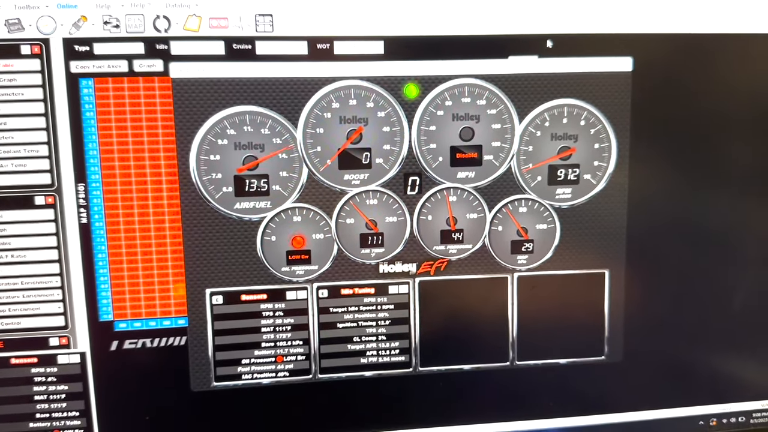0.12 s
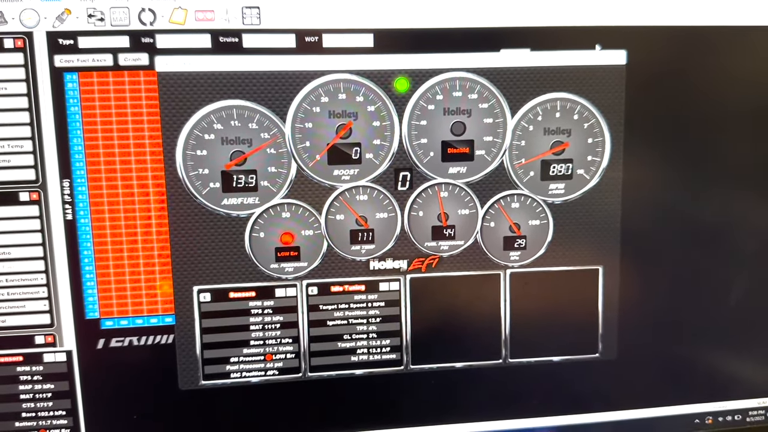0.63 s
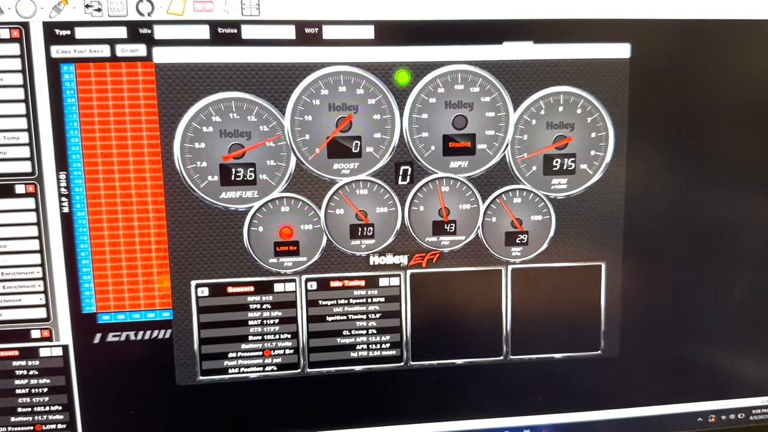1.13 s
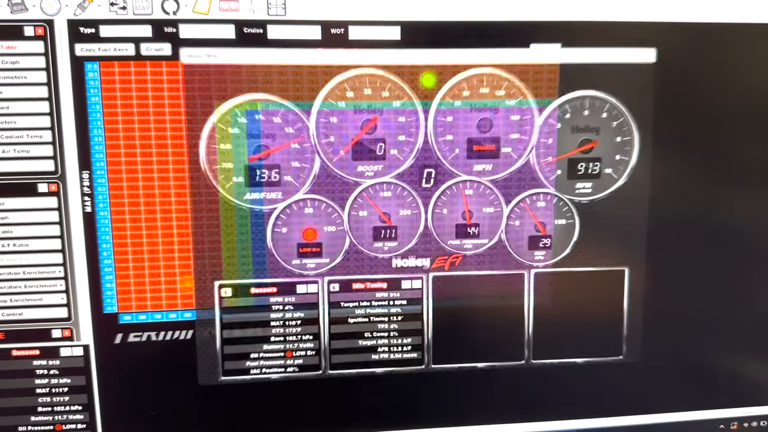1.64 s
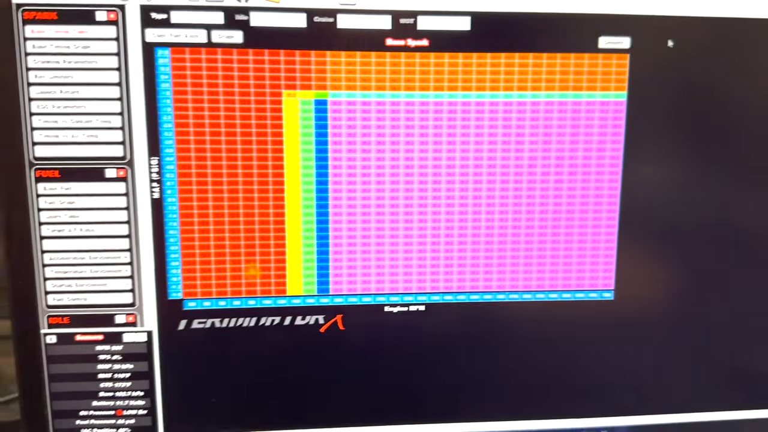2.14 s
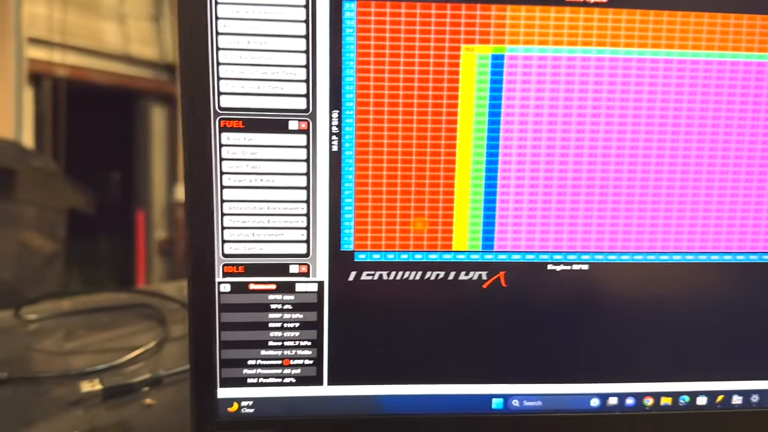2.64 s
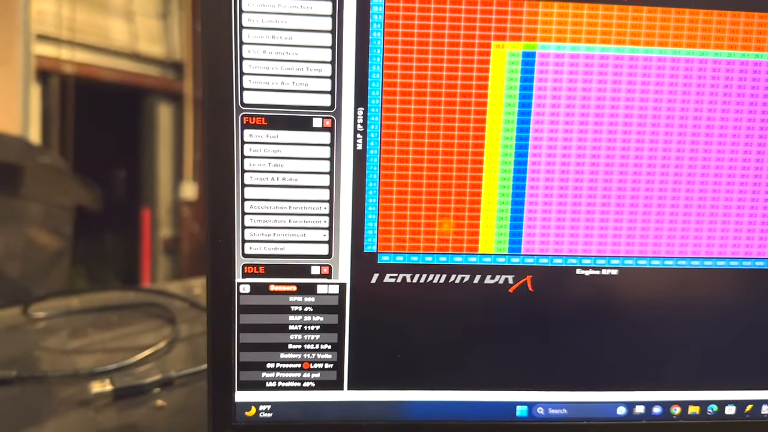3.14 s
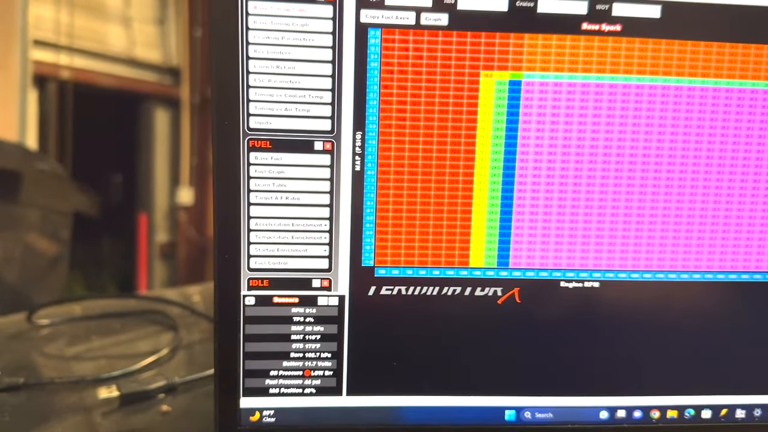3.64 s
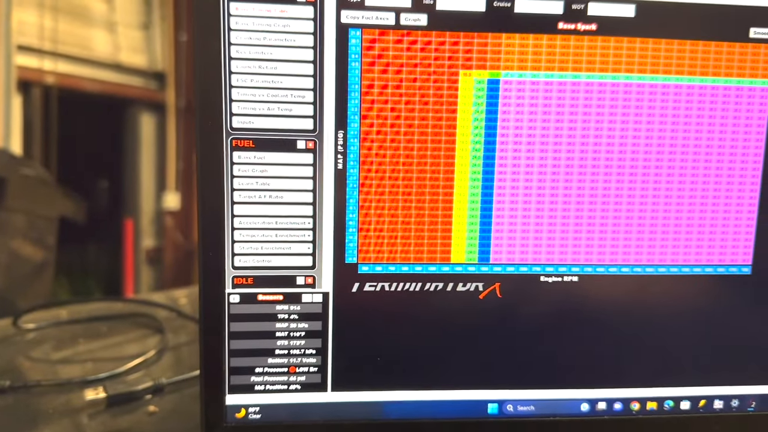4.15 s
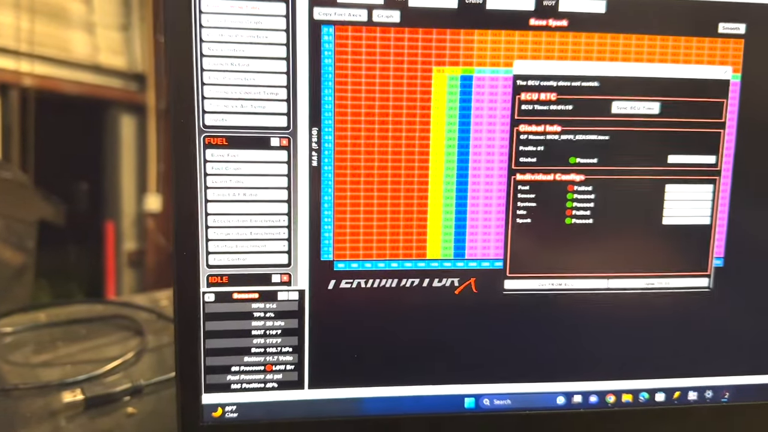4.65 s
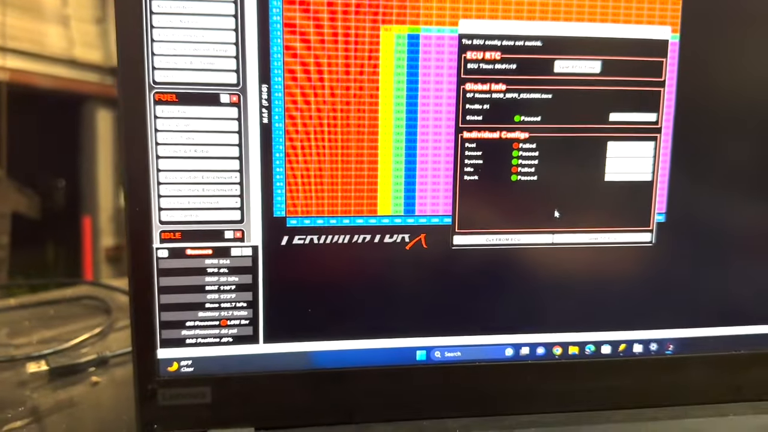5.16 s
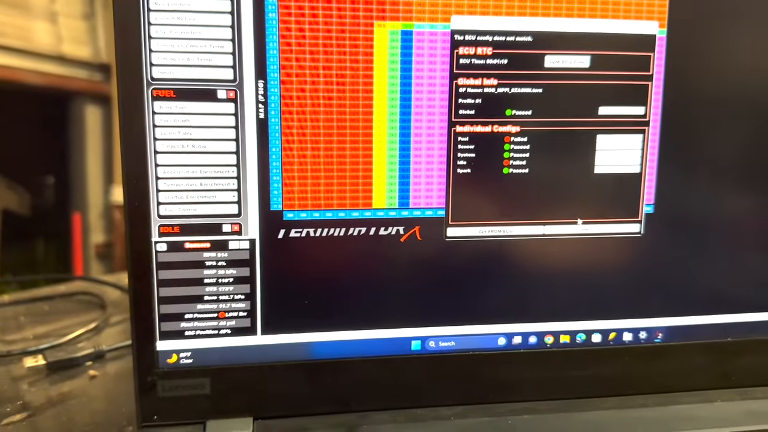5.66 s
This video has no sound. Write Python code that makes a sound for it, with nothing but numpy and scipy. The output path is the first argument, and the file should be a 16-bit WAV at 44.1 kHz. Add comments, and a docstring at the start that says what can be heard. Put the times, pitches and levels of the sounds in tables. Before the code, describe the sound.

Lumpy big-engine idle with low exhaust pulses, a thin wavering blower whine and soft mechanical hiss, growing slightly louder throughout.

```python
"""A rough, throbbing V8 idle near 900 rpm in a garage, with a supercharger's whine and a bed of hiss, in stereo.
Exhaust: eight uneven firings in two banks strike the decaying resonances of pipes and room.
Blower: sines at multiples of the rotor rate follow the crank and sing up when the idle flares.
Chuff: a puff of noise once a cycle excites a short pipe resonance.
Air: shaped noise for exhaust turbulence, belts and intake, with broad rings and a flickering level."""
import sys
import numpy as np
from scipy import signal
from scipy.fft import rfft, irfft
from scipy.io import wavfile
from scipy.ndimage import uniform_filter1d

SR = 44100
rng = np.random.default_rng(int(sys.argv[2]) if len(sys.argv) > 2 else 0)


def decibels_to_gain(level_db):
    """Convert a level in decibels to a linear amplitude gain (20 dB per decade)."""
    exponent = np.asarray(level_db, float) / 20
    return 10 ** exponent


def store_wav(level_fs):
    """Save 16-bit WAV to argv[1]."""
    pcm = np.round(np.clip(np.atleast_2d(level_fs), -1, 1) * 32767)
    wavfile.write(sys.argv[1], SR, pcm.T.astype(np.int16))


N = 254898
T = np.arange(N) / SR
HZ = np.fft.rfftfreq(N, 1 / SR) + 1e-3  # the offset keeps log(HZ) finite

# crank speed: (time [s], speed [rpm])
CRANK_SPEED = [(0.0, 909.81), (0.251, 897.77), (0.503, 895.82), (0.755, 908.46), (1.012, 916.3),
               (1.514, 909.66), (1.788, 911.91), (2.28, 896.48), (2.783, 899.32), (3.286, 911.81),
               (3.517, 914.74), (3.786, 932.75), (4.243, 934.19), (4.441, 925.83), (4.71, 913.22),
               (5.573, 903.78), (5.78, 906.38)]
# relative loudness at the phone: (time [s], exhaust [dB], turbulence, chuff and hiss [dB])
NEARNESS_LEVELS = [(0, -2.5, -1.5), (.8, -1.5, -1), (1.6, 0, 0.5), (2.4, -1, 0), (3.2, 0.5, 1), (4, -1, 2),
                   (4.9, 0.35, 1.96), (5.78, 0.5, 2)]


def curve(table, order):
    """One column of a table, interpolated over time."""
    table = np.array(table)
    return np.interp(T, table[:, 0], table[:, order])


def colour(x, points, boost_db=0):
    """Shape a sound's spectrum by (frequency [Hz], level [dB]) points on a log axis, plus a boost."""
    hz, db = np.transpose(points)
    gain_db = np.interp(np.log(HZ), np.log(hz), db) + boost_db
    return irfft(rfft(x) * decibels_to_gain(gain_db), N)


def resonance(hz, width_hz):
    """Bell over frequency, 1 at its centre and one half at the edges of its width."""
    return 1 / (1 + (2 * (HZ - hz) / width_hz) ** 2)


def walk(rate):
    """Random levels held 1 / rate s and smoothed twice; spread near 1."""
    hold = int(SR / rate)
    held = np.repeat(rng.standard_normal(N // hold + 1), hold)
    return 1.67 * uniform_filter1d(uniform_filter1d(held, hold), hold)[:N]


def exhaust(cycle):
    """One pressure pulse a firing, never quite equal; each bank rings the resonances in its own way."""
    # in firing order; lateness comes from header length:
    # (bank [0 or 1], relative strength [dB], mean lateness [ms])
    cylinders = [(1, -0.4, 1.21), (0, 0.4, 0.65), (1, 0.2, 1.48), (1, 3.8, 1.64), (0, -1.1, 0.63),
                 (1, -3.6, 0.88), (0, -3.2, -0.38), (0, 4.0, 0.27)]
    # exhaust and garage resonances: (frequency [Hz], t60 [s], then signed relative gains [per mille]:
    # left port from bank 0, left from bank 1, right port from bank 0, right from bank 1)
    exhaust_modes = [(64.7, 0.16, 134, 278, 157, 318), (69.3, 0.3, -393, -121, -356, -108),
                     (75.2, 0.13, 240, -354, 136, -336), (94.3, 0.1, -181, -134, -214, -208),
                     (107.5, 0.29, 110, 62, 89, 92), (124.9, 0.3, -53, 78, -54, 80),
                     (137.8, 0.3, -59, -134, -90, -195), (152.2, 0.41, 83, 71, 121, 100),
                     (174.0, 0.3, -1, 46, -3, 62), (191.0, 0.31, -14, -3, -24, -4),
                     (202.4, 0.45, 1, 12, -2, 7), (221.9, 0.16, 19, -12, 27, -27),
                     (248.1, 0.24, 38, 24, 42, 39), (262.6, 0.35, -19, -23, -22, -24),
                     (288.2, 0.19, 12, 4, 16, 3), (333.4, 0.27, 11, -33, 18, -25),
                     (338.0, 0.18, -11, 27, -13, 16), (389.4, 0.22, -6, 30, 4, 17),
                     (394.6, 0.17, 9, -28, 2, -16)]
    scatter_db, jitter_ms = .6, .08

    firing = np.arange(-24, int(8 * cycle[-1]))
    bank, strength_db, late_ms = np.array(cylinders)[firing % 8].T

    # the engine already runs, so the room is ringing from the start
    lead = SR // 2
    earlier = cycle[0] - (cycle[1] - cycle[0]) * np.arange(lead, 0, -1)
    turns = np.r_[earlier, cycle]

    time_chance, level_chance = rng.standard_normal((2, len(firing)))
    on_time = np.interp(firing / 8, turns, np.arange(lead + N))
    at = on_time + (late_ms + jitter_ms * time_chance) * SR / 1000
    pulses = np.zeros((2, lead + N + SR))
    pulses[bank.astype(int), at.astype(int)] = decibels_to_gain(strength_db + scatter_db * level_chance)

    ports = 0
    for hz, t60, *gains in exhaust_modes:
        pole = np.exp(2j * np.pi * hz / SR - np.log(1000) / (t60 * SR))
        ringing = signal.lfilter([1], [1, -pole], pulses).imag  # decaying sines, one row a bank
        ports = ports + np.reshape(gains, (2, 2)) / 1000 @ ringing

    # the small microphone loses the deepest bass
    cut = signal.butter(2, 55, "high", fs=SR, output="sos")
    heard = signal.sosfilt(np.r_[cut, cut], ports)[:, lead:lead + N]
    return heard * decibels_to_gain(curve(NEARNESS_LEVELS, order=1))


def blower(cycle):
    """Multiples of the rotor-lobe rate; a steady direct part plus reflections that flutter in size and phase."""
    # rotor multiples, relative levels: (multiple, rms common to both ports [dB], rms differing [dB],
    # common gain in the flare [dB], differing gain in the flare [dB])
    whine_lines = [(2, -44, -50, -3, 0), (5, -47, -45, -4, -2), (6, -54, -51, 2, 0), (7, -53, -53, -2, 0),
                   (8, -50, -55, 5, 8), (9, -56, -54, 8, 8), (10, -48, -43, 7, 0), (11, -53, -52, 11, 9),
                   (12, -54, -57, 6, 8), (13, -56, -59, -4, -1), (14, -58, -61, -3, 0),
                   (15, -57, -61, -3, 0), (17, -66, -69, 0, 0), (19, -63, -65, 0, 0), (20, -65, -67, 0, 0),
                   (21, -64, -67, 0, 0), (31, -64, -67, 0, 0), (32, -62, -67, -3, 0), (38, -69, -71, 0, 0)]
    # one multiple stands out or fades for a while as the phone drifts through standing waves:
    # (multiple, middle [s], length [s], common gain [dB], differing gain [dB])
    drifts = [(10, 1.05, .5, 5, 0), (13, 1.5, 1.3, 4, 0), (10, 1.7, .9, 1, 4), (8, 2.35, 1.1, 4, 0),
              (11, 2.5, .9, 8, 8), (5, 2.55, .9, -5, -4), (5, 1.3, 1.3, 2, 2), (9, 3.35, .6, 7, 4),
              (9, 5.0, .5, 7, 2), (8, 5.65, .5, -10, -2)]
    rotor_per_cycle = 21.585
    steady, flutter = .93, .26
    flare_rpm, flare_span_rpm = 923, 3  # the whine sings up when the idle flares past this speed
    flare_lag_s = .07  # the casing takes this long to build up and let go

    # belt tension makes all multiples swell together
    swell = decibels_to_gain(1.6 * walk(9))
    lagged_rpm = np.interp(T - flare_lag_s, *np.transpose(CRANK_SPEED))
    flare = (1 + np.tanh((lagged_rpm - flare_rpm) / flare_span_rpm)) / 2

    parts = np.zeros((2, N))  # common, differing
    for multiple, *db in whine_lines:
        level_db = np.c_[db[:2]] + np.c_[db[2:]] * flare
        for which, middle, length, *gain_db in drifts:
            if which == multiple:
                level_db = level_db + np.c_[gain_db] * np.exp(-(2 * (T - middle) / length) ** 4)
        for part in range(2):
            turn = np.exp(2j * np.pi * (multiple * rotor_per_cycle * cycle + rng.random()))
            path = steady + flutter * (walk(40) + 1j * walk(40))
            parts[part] += decibels_to_gain(level_db[part]) * np.sqrt(2) * (path * turn).real
    common, differing = parts
    return swell * np.array([common + differing, common - differing])


def chuff(cycle):
    """Once a cycle one cylinder's gas puffs through a short pipe resonance, different every time."""
    moment, sharpness = .33, 4.  # moment in cycles
    level_db = -40.5  # rms, relative to the nearness curve
    gate = np.exp(sharpness * (np.cos(2 * np.pi * (cycle - moment)) - 1))
    puffs = rng.standard_normal(N) * gate
    ring = irfft(rfft(puffs) * resonance(387.0, width_hz=93.0), N)
    level = decibels_to_gain(level_db + curve(NEARNESS_LEVELS, order=2))
    return level * ring / ring.std() * np.array([[.9], [1.1]])  # left, right


def air():
    """Turbulence and hiss: noise with a few broad rings, each leaning to one port."""
    # steady noise before the rings, common and differing part of the two ports:
    # (frequency [Hz], relative density [dB per Hz])
    noise_mid = [(30, -65.5), (46, -61.5), (60, -50), (140, -49.5), (310, -57.5), (420, -61), (560, -71),
                 (1000, -72), (1600, -71), (2400, -78), (4130, -88.5), (9400, -95.5), (10200, -102),
                 (11500, -125), (13000, -101), (15500, -101)]
    noise_side = [(40, -95), (70, -72), (125, -51.5), (200, -59.5), (300, -60.5), (420, -59.5), (560, -72),
                  (1600, -69.5), (2400, -80), (4130, -89.5), (7500, -97.5), (8800, -105), (9600, -96),
                  (13000, -102), (14000, -125)]
    # ringing of panels, belt drive and intake in the hiss:
    # (frequency [Hz], width [Hz], boost [dB], left minus right share)
    hiss_peaks = [(510.5, 21, 4.5, -.1), (624, 23, 8.5, -0.18), (765, 33, 7, -.1), (1260, 110, 2.5, -0.34),
                  (2394, 88, 4, -.1), (3070, 110, 1.5, .1), (3660, 300, 3.5, 0.32), (4540, 230, 4.5, .3),
                  (5143, 520, 11.5, 0.66), (5650, 160, 8, .5), (6205, 200, 8, .4), (6784, 470, 8.5, 1),
                  (7390, 810, 4, .2)]

    boost_db, lean = 0, 0
    for hz, width_hz, peak_db, share in hiss_peaks:
        bell = resonance(hz, width_hz)
        boost_db = boost_db + peak_db * bell
        lean = lean + share * bell

    unit = np.sqrt(SR / 2)  # gives white noise a power of 1 per Hz
    mid = colour(rng.standard_normal(N) * unit, noise_mid, boost_db)
    side = colour(rng.standard_normal(N) * unit, noise_side, boost_db)
    side = side + irfft(rfft(mid) * lean, N)

    flicker_db = .31 * walk(7.7)
    level = decibels_to_gain(curve(NEARNESS_LEVELS, order=2) + flicker_db)
    return level * np.array([mid + side, mid - side])


def scene():
    """Crank speed drives firings, puffs and rotors alike; a cycle is two crank turns."""
    start_cycle = .0323
    cycle = start_cycle + np.cumsum(curve(CRANK_SPEED, order=1)) / 120 / SR
    return decibels_to_gain(1.28) * exhaust(cycle) + decibels_to_gain(0.67) * blower(cycle) + chuff(cycle) + air()


def roll_off(x):
    """The treble ends steeply here."""
    return signal.sosfilt(signal.butter(12, 15630, fs=SR, output="sos"), x)


def record(dry):
    """The finished mix as the phone keeps it."""
    return roll_off(dry)


dry = scene()
out = record(dry)
store_wav(out)
```